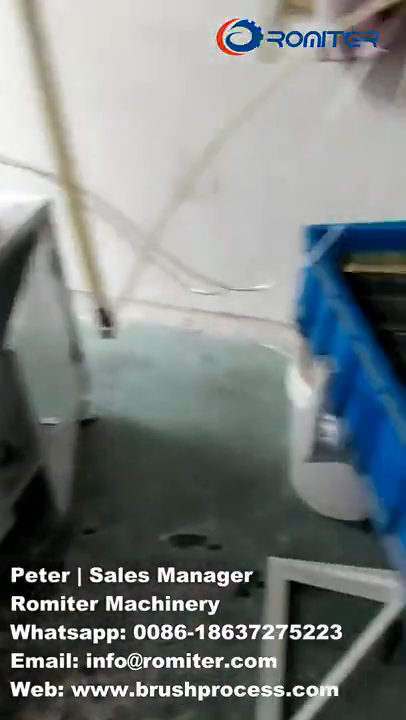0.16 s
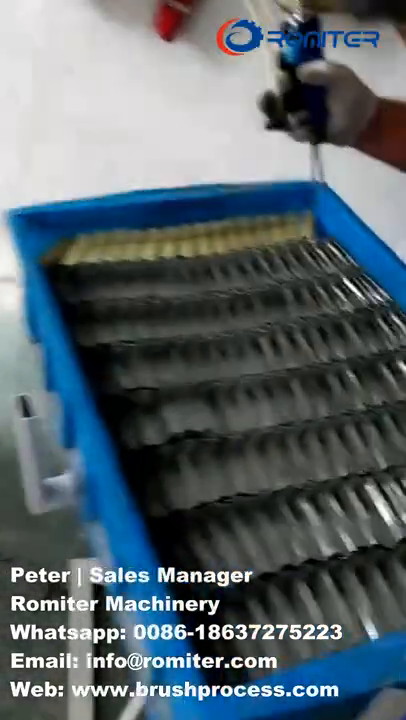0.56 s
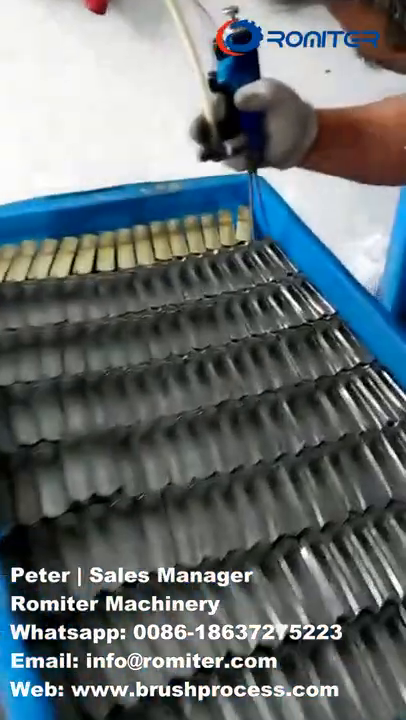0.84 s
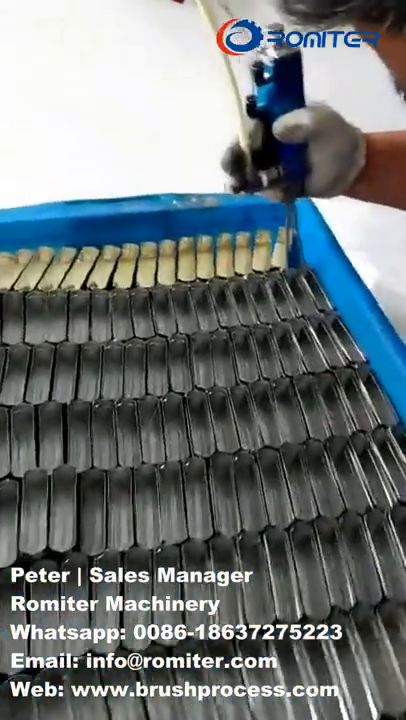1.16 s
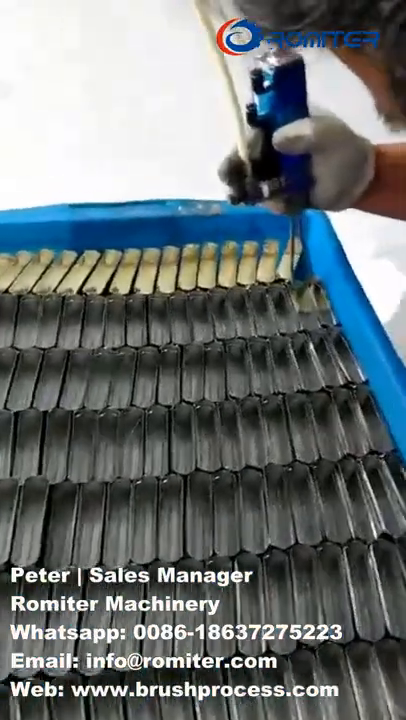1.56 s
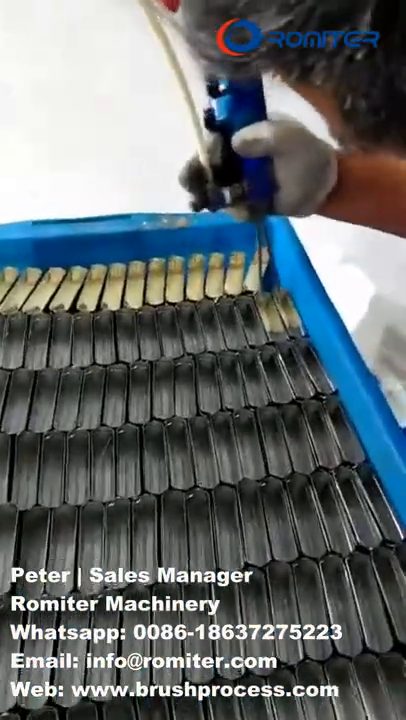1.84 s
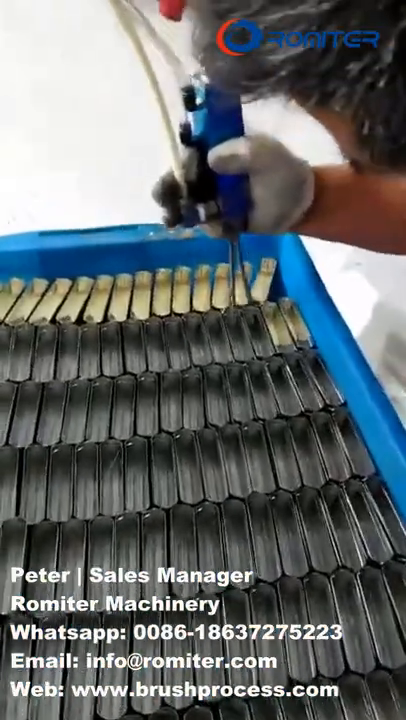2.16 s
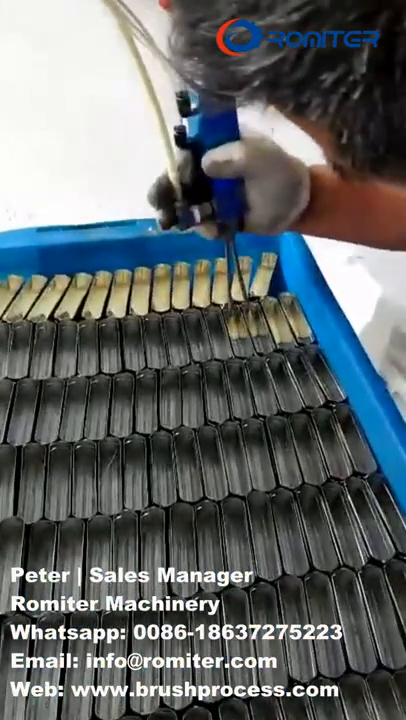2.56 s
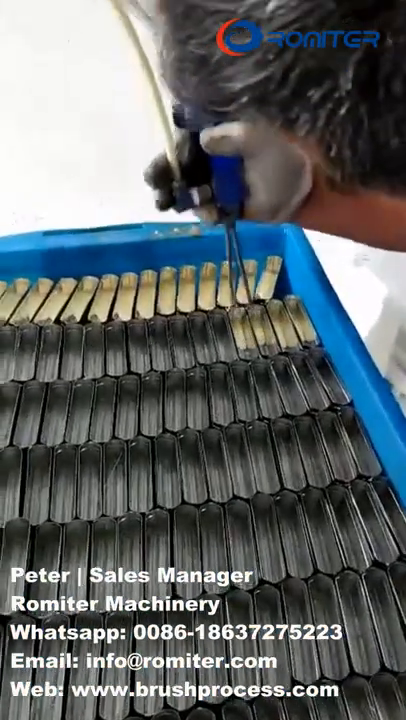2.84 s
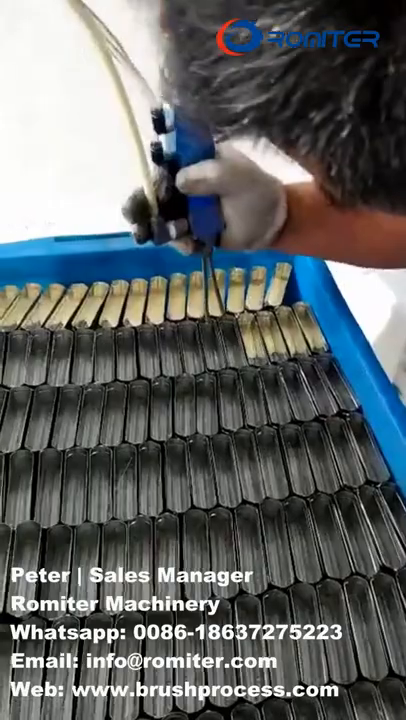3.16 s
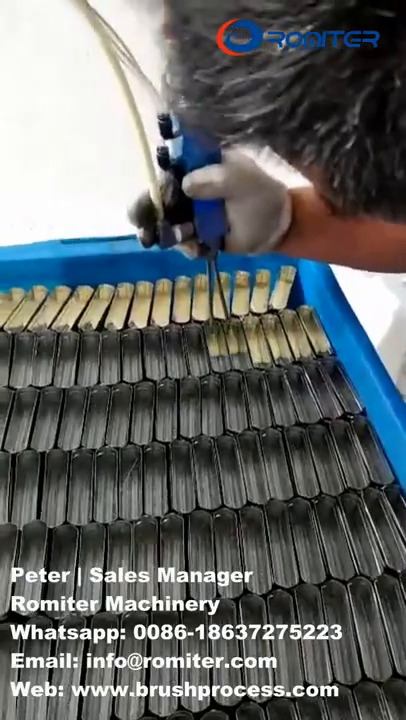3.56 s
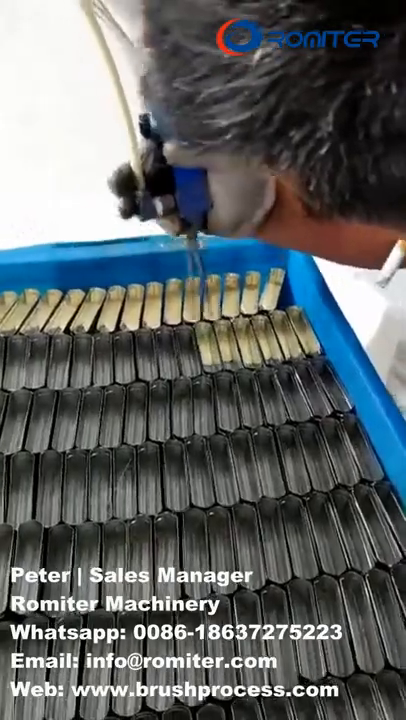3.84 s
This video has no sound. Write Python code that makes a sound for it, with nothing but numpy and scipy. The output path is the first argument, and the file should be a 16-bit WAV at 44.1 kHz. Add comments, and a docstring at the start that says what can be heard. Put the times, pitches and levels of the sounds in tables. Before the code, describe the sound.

Repeated air blasts and hisses from a pneumatic dispenser, with hollow thumps, in a workshop.

```python
"""A hard-walled workshop, where a pneumatic glue gun cycles about once a second over a machine's hum.
Each stroke opens with a blast of air from the valve and a hollow thump from the cylinder and its mount.
On the dispensing stroke the exhaust hiss sags as the cylinder empties; on the return it holds nearly
steady and the piston knocks on its end stop. Once the valve clacks shut for a pause, and the trigger
clicks before work goes on."""
import sys
import numpy as np
from scipy import signal
from scipy.fft import rfft, irfft
from scipy.io import wavfile

SR = 44100
rng = np.random.default_rng(int(sys.argv[2]) if len(sys.argv) > 2 else 0)


def generate_wav(sig):
    """Save sig (samples, or channels by samples) to the path in sys.argv[1] as 16-bit PCM at SR."""
    pcm = np.round(np.clip(np.atleast_2d(sig).T, -1, 1) * 32767).astype(np.int16)
    wavfile.write(sys.argv[1], SR, pcm)


N = 176400
T = np.arange(N) / SR


def from_db(db):
    """Decibels to gain."""
    return 10 ** (np.asarray(db) / 20)


def unit_power(x):
    """Scale to an RMS of 1."""
    return x / np.sqrt(np.mean(x ** 2) + 1e-20)


def eq(x, curve):
    """Filter by a curve of (freq_hz, gain_db) points."""
    hz, db = np.transpose(curve)
    f = np.maximum(np.fft.rfftfreq(N, 1 / SR), 1)
    return irfft(rfft(x) * from_db(np.interp(np.log(f), np.log(hz), db)), N)


def drift(rate_hz):
    """Smooth random motion of spread 1."""
    f = np.fft.rfftfreq(N, 1 / SR)
    return unit_power(irfft(rfft(rng.standard_normal(N)) / (1 + (f / rate_hz) ** 2), N))


def noise(colour, flutter_db=0):
    """Coloured noise of unit power, with an optional quick flutter."""
    return unit_power(eq(rng.standard_normal(N) * from_db(flutter_db * drift(75)), colour))


def tone(hz):
    """A sine of unit power, wavering in phase and level."""
    return unit_power(np.sin(2 * np.pi * hz * T + 0.71 * drift(11)) * from_db(2 * drift(4.1)))


def envelope(start_s, rise_s, hold_s, fall_db_per_s):
    """Linear attack, hold, exponential release."""
    t = T - start_s
    return np.clip(t / rise_s, 0, 1) * from_db(-fall_db_per_s * np.maximum(t - rise_s - hold_s, 0))


def echoes(x, t60_s, treble_t60_s, predelay_s):
    """Dense reflections of unit energy, with a separate decay time above 4 kHz."""
    t, white = T[:SR], rng.standard_normal(SR)
    low = signal.sosfilt(signal.butter(1, 4000, fs=SR, output="sos"), white)
    tail = low * from_db(-60 * t / t60_s) + (white - low) * from_db(-60 * t / treble_t60_s)
    tail *= t > predelay_s
    return signal.fftconvolve(x, tail / np.linalg.norm(tail))[:N]


# Colour of the room tone: freq_hz, gain_db
ROOM_TONE_EQ = [(25, -37), (60, -61), (95, -5.5), (170, -14.5), (250, 0.5), (310, -3.5), (410, -6.5),
                (520, -6), (900, -7), (1400, -13), (2200, -12), (4000, -18), (6200, -22.5), (7200, -30),
                (14000, -40)]
# Level of the motor's hum over time: time_s, level_db
MOTOR_LEVEL = [(0, -69), (.6, -55.5), (1.2, -66), (1.7, -62), (2.8, -62.5), (3.2, -76), (4, -63)]
# Faint machine tones: pitch_hz, level_db
MACHINE_TONES = [(132, -81.5), (3848, -79), (5370, -76)]

def workshop():
    """Distant machinery: a dull wash, a motor's hum and a few faint tones."""
    wash = from_db(-57) * noise(ROOM_TONE_EQ, flutter_db=-0.1)
    motor = from_db(np.interp(T, *np.transpose(MOTOR_LEVEL))) * tone(hz=255)
    return wash + motor + sum(from_db(db) * tone(hz) for hz, db in MACHINE_TONES)


# Colour of the trigger's thin tick: freq_hz, gain_db
TRIGGER_EQ = [(500, -29), (2500, -14), (3900, 5), (5200, -9), (8000, -17), (14000, -24)]

def trigger(start_s=1.2255):
    """The trigger clicks at the end of the pause."""
    return from_db(-45.5) * envelope(start_s, 0.002, 0.002, 830) * noise(TRIGGER_EQ)


# Colours of the closing valve's hard clack and hollow ring: freq_hz, gain_db
CLACK_EQ = [(150, -20), (600, 0), (1300, -6.5), (2200, 4.5), (4000, -13), (14000, -31)]
RING_EQ = [(80, -20), (280, -4.5), (370, -2), (450, 6.5), (600, -14.5), (1200, -23), (4000, -45)]

def valve_shut_off(start_s=0.85):
    """The valve closes for a pause: a short clack over a longer ring."""
    clack = from_db(-43.5) * envelope(start_s, 0.0025, 0.011, 146) * noise(CLACK_EQ, flutter_db=1.5)
    ring = from_db(-47.5) * envelope(start_s, 0.0043, 0.029, 65) * noise(RING_EQ, flutter_db=2)
    return clack + ring


# Hits on the end stop: start_s, level_db
STOP_HITS = [(0.676, -44.5), (2.137, -43), (3.117, -42.5)]
# Colour of the knock: freq_hz, gain_db
KNOCK_EQ = [(80, -38), (300, -3), (650, -6.5), (800, 0.5), (930, 1), (1100, -4.5), (1400, -10),
            (2200, -2.5), (4000, -12.5), (7000, -15), (14000, -20)]

def piston_knocks():
    """The returning piston meets its end stop."""
    level = sum(from_db(db) * envelope(start_s, 0.004, 0.026, 141) for start_s, db in STOP_HITS)
    return level * noise(KNOCK_EQ, flutter_db=1.5)


# Cue sheets of the strokes, shared by thumps, exhaust and blasts:
# start_s, length_s, blast_lag_s, blast_db, blast_fall_db_per_s, blast_tilt_db_per_octave,
# thump_db, thump_tilt_db_per_octave, exhaust_db, exhaust_sag_db_per_s
DISPENSE_CUES = [(-.17, 0.86, .007, -16, 296, -4, -26.5, 2, -36, 23),
                 (1.264, 0.59, 0.0068, -27, 130, 1.4, -40, 0, -39, 5),
                 (2.289, 0.45, 0.0056, -31, 250, -2.4, -36.5, 0, -38, 14.5),
                 (3.266, 0.447, 0.0084, -29.5, 318, -0.5, -37.5, -1, -38, 19)]
RETURN_CUES = [(.329, 0.54, 0.017, -30, 232, -0.34, -39, -2.6, -44.5, 0.61),
               (1.792, .5, 0.015, -27.5, 260, -0.4, -34, 0.47, -43, 0.71),
               (2.770, 0.46, 0.013, -27.5, 260, -0.14, -35, 1.7, -44.5, 0.72),
               (3.744, .52, 0.016, -29.5, 260, 0.48, -36.5, 0.88, -44, 1)]
# Modes of the cylinder and its mount: pitch_hz, dispense_gain_db, return_gain_db, delay_s, swell_s
BODY_MODES = [(104.6, -18.5, -20, 0.0055, 0.033), (132.7, -1.5, -8.5, 0.0059, 0.014),
              (223.4, -7.5, -31.5, 0, 0.015), (363.7, -9, -12, .0, 0.012), (406.2, 3.5, 3, 0.011, 0.022),
              (474.3, -14.5, -31, 0.0006, 0.026), (598, -30, -5.5, 0.021, 0.021),
              (700.8, -25, 6.5, 0.0214, 0.0049), (947, -7.5, 4, 0.013, 0.0057)]
# Colour of the low turbulence around the thump: freq_hz, gain_db
RUSH_EQ = [(30, -14), (65, -20), (115, -6), (180, -8.5), (245, -4.5), (295, -6), (400, 7), (550, -0.5),
           (700, 0), (810, -11), (980, -3), (1300, -12), (2200, -45), (6000, -54)]

def thumps():
    """The pressure step swells the body's modes, alike on each stroke of a kind, in a low rush of air."""
    out, t = np.zeros(N + SR), T[:SR // 3]
    hz, dispense_db, return_db, delay_s, swell_s = np.transpose(BODY_MODES)[:, :, None]
    age = np.maximum(t - delay_s, 0) / swell_s
    swell = (age * np.exp(1 - age)) ** 2
    octaves = np.log2(hz / np.median(hz))
    for cues, mode_db, rush_db in ((DISPENSE_CUES, dispense_db, -2.5), (RETURN_CUES, return_db, -1.5)):
        rings = swell * np.sin(2 * np.pi * (hz * t + rng.random(hz.shape)))
        rush = noise(RUSH_EQ)
        for start_s, *_, thump_db, tilt, _, _ in cues:
            out[:N] += rush * from_db(thump_db + rush_db) * envelope(start_s, 0.0055, 0.029, 183)
            if start_s > 0:
                gains = from_db(thump_db + mode_db + tilt * octaves)
                out[int(start_s * SR):][:len(t)] += (gains * rings).sum(0)
    return out[:N]


# Resonances of the exhaust port: centre_hz, width_hz, gain_db
PORT_BANDS = [(2800, 33, 2.5), (4116, 50, 2.5), (4570, 49, 3), (4860, 95, 2.5), (5660, 51, -7)]

def exhaust_port(hiss):
    """The port lifts four narrow bands of the hiss and dips a fifth."""
    return hiss + sum((from_db(db) - 1) * signal.lfilter(*signal.iirpeak(hz, hz / width_hz, fs=SR), hiss)
                      for hz, width_hz, db in PORT_BANDS)


# Colours of the hiss in each direction, and of the fine spray on top: freq_hz, gain_db
DISPENSE_HISS_EQ = [(300, -21), (900, -12), (1550, -13), (2200, -2.5), (3000, -2), (4500, -1), (5400, 1),
                    (6400, -3.5), (6950, -12.5), (9000, -17), (11500, -23), (14000, -15)]
RETURN_HISS_EQ = [(300, -39), (900, -6), (1550, -11), (2200, -2.5), (2850, 0.5), (3300, -1.5), (5200, 2),
                  (6400, -2), (6950, -9.5), (9000, -11.5), (11500, -16.5), (14000, -11)]
SPRAY_EQ = [(3000, -34), (6000, 0), (7300, 1), (9000, -0.5), (11500, -2.5), (14000, -0.5)]

def exhaust(rise_s=0.027, empty_after_s=0.37, empty_db_per_s=22):
    """Air leaves the muffler: sagging as glue is pushed out, nearly even on the way back."""
    hiss, total_flow = 0, 0
    for cues, colour, emptying in ((DISPENSE_CUES, DISPENSE_HISS_EQ, empty_db_per_s),
                                   (RETURN_CUES, RETURN_HISS_EQ, 0)):
        flow = 0
        for start_s, length_s, *_, exhaust_db, sag in cues:
            sag_db = sag * np.maximum(T - start_s, 0)
            empty_db = emptying * np.maximum(T - start_s - empty_after_s, 0)
            gate = envelope(start_s, rise_s, length_s - rise_s, fall_db_per_s=116)
            flow += gate * from_db(exhaust_db - sag_db - empty_db)
        hiss += flow * noise(colour, flutter_db=0.5)
        total_flow = np.hypot(total_flow, flow)
    # The spray grows faster than the flow, so strong air sounds brighter.
    spray = from_db(-51) * (total_flow / from_db(-41.5)) ** 3.1 * noise(SPRAY_EQ)
    return exhaust_port(hiss) + spray


# Colour of the blast in each direction: freq_hz, gain_db
DISPENSE_BLAST_EQ = [(300, -7), (900, -11.5), (1450, -12.5), (2000, -2.5), (2700, 0.5), (3600, 3),
                     (4700, -0.5), (6000, 0.5), (7300, -5.5), (8600, -8), (10500, -21.5), (12000, -18),
                     (14000, -13)]
RETURN_BLAST_EQ = [(300, -30), (900, 3), (1500, -10), (2100, -2.5), (2850, 3), (4000, 2.5), (5100, -1.5),
                   (6300, 0.5), (7300, -3), (8600, -9.5), (10500, -16), (12000, -14), (14000, -10.5)]

def blasts(spurt_lead_s=0.0083):
    """A spurt slips past the valve's moving spool, then the opened port gives its full blast."""
    out = 0
    for cues, colour in ((DISPENSE_CUES, DISPENSE_BLAST_EQ), (RETURN_CUES, RETURN_BLAST_EQ)):
        for start_s, _, lag_s, blast_db, fall_db_per_s, tilt, *_ in cues:
            spurt = from_db(-11.5) * envelope(start_s - spurt_lead_s, 0.0072, 0.017, 400)
            blast = envelope(start_s + lag_s, 0.007, 0.013, fall_db_per_s)
            tilted = [(hz, db + tilt * np.log2(hz)) for hz, db in colour]
            out += from_db(blast_db) * np.maximum(spurt, blast) * noise(tilted, flutter_db=0.34)
    return out


# Stereo width of the blasts and thumps: freq_hz, side_gain_db
SIDE_EQ = [(100, -18), (500, -23), (2000, -23), (6500, -20), (8000, -14), (9500, 0), (11000, -12),
           (14000, -14)]

def scene():
    """The gun and its echoes sit centre; blasts and thumps spread sideways, widest in the high treble."""
    air = blasts() + exhaust()
    early = echoes(air, t60_s=0.15, treble_t60_s=0.15, predelay_s=0.00074)   # bench, floor and wall
    early_gain = from_db(-7)
    air = (air + early_gain * early) / np.hypot(1, early_gain)
    body = thumps() + piston_knocks() + valve_shut_off() + trigger()
    room_send = from_db(-11.5) * air + from_db(-15) * body
    room = echoes(room_send, t60_s=0.72, treble_t60_s=0.48, predelay_s=0.012)
    middle = air + body + room + workshop()
    side = eq(blasts() + 0.5 * thumps(), SIDE_EQ)   # fresh noise on the same cues gives width
    return np.array([middle + side, middle - side])


def record(dry):
    """The small microphone loses the deep bass; the top is cut steeply."""
    low_cut_hz, high_cut_hz = 94, 14050
    thin = signal.sosfilt(signal.butter(2, low_cut_hz, "high", fs=SR, output="sos"), dry)
    return signal.sosfilt(signal.ellip(12, 0.1, 80, high_cut_hz, fs=SR, output="sos"), thin)


dry = scene()
out = record(dry)
generate_wav(out)
```